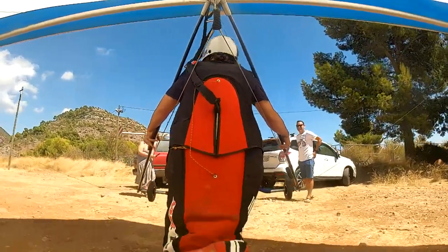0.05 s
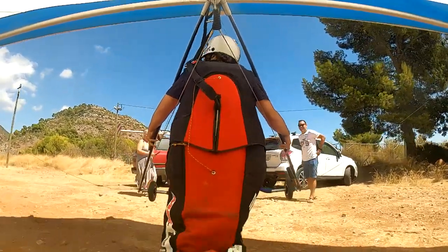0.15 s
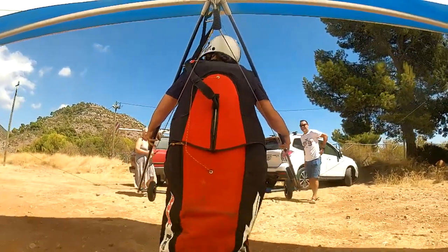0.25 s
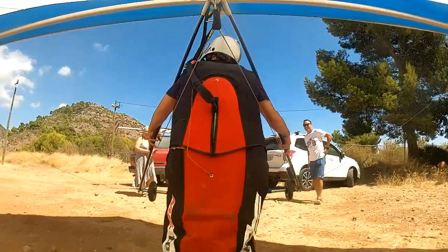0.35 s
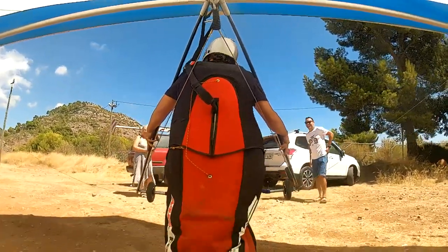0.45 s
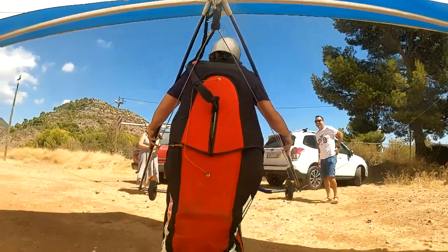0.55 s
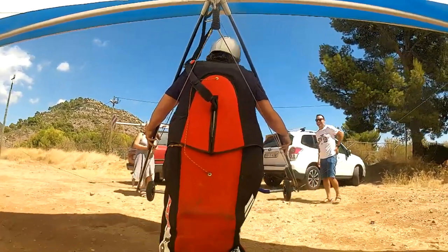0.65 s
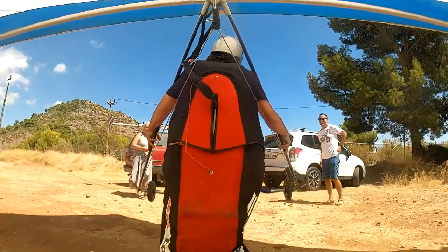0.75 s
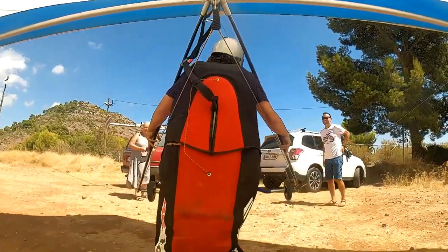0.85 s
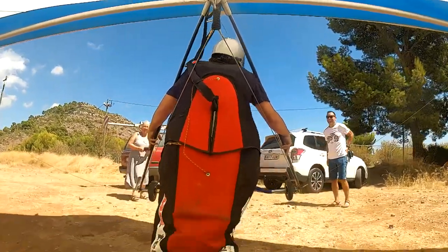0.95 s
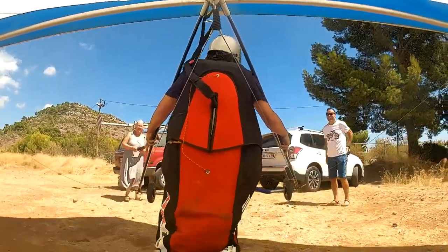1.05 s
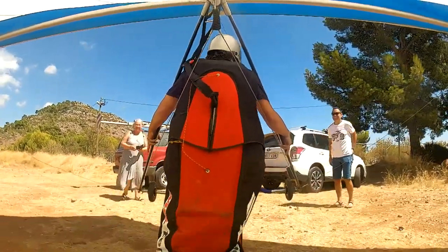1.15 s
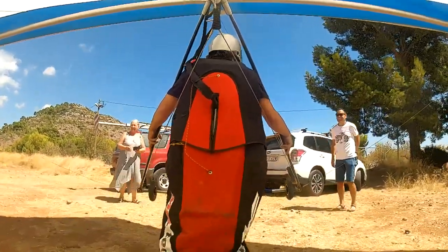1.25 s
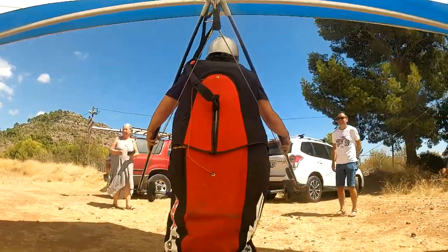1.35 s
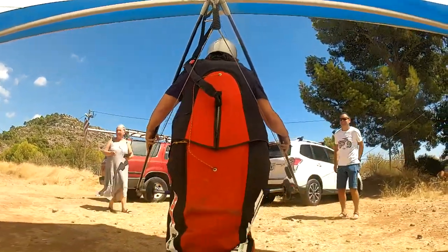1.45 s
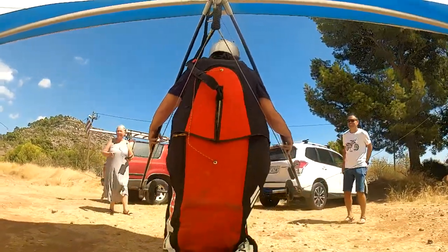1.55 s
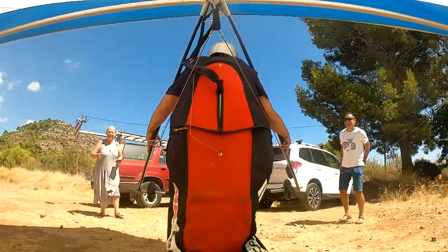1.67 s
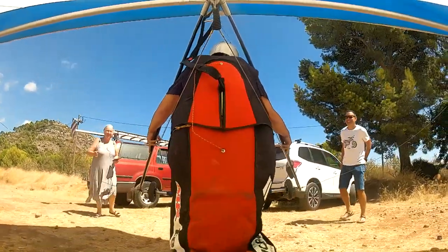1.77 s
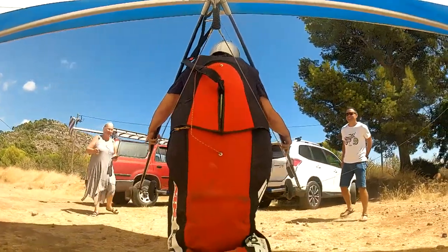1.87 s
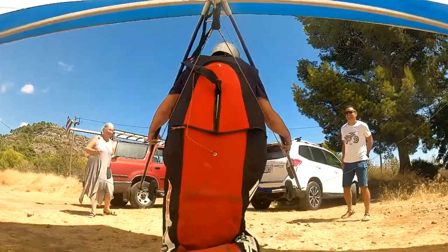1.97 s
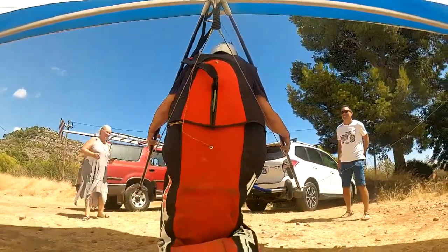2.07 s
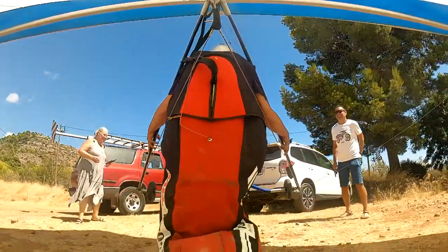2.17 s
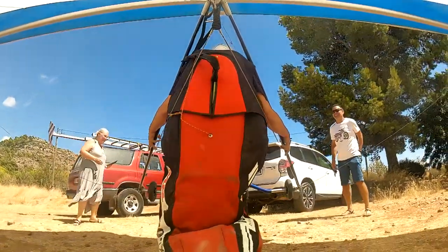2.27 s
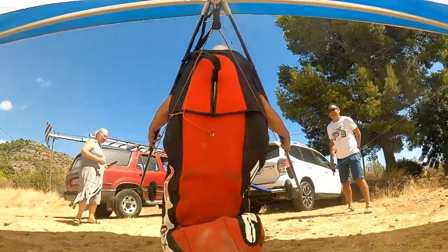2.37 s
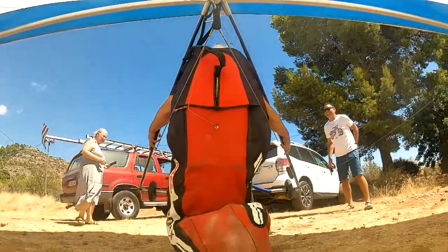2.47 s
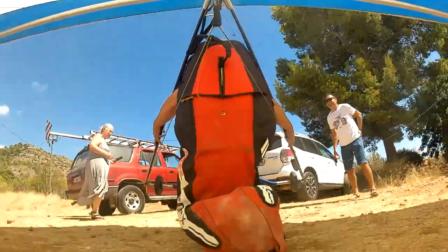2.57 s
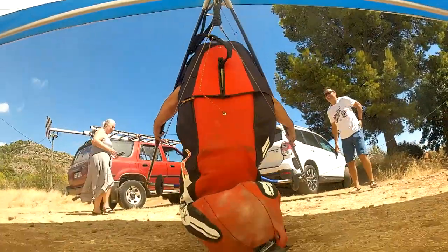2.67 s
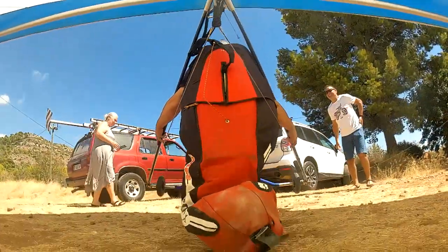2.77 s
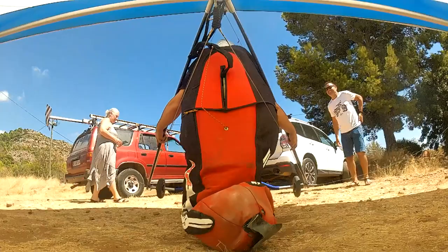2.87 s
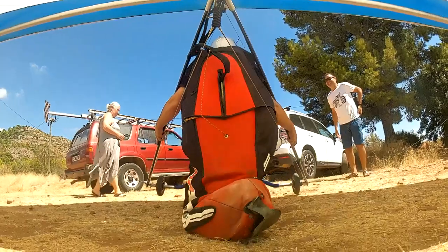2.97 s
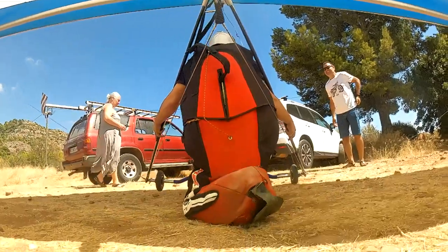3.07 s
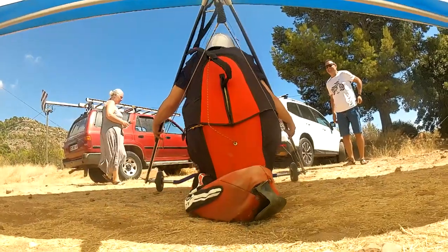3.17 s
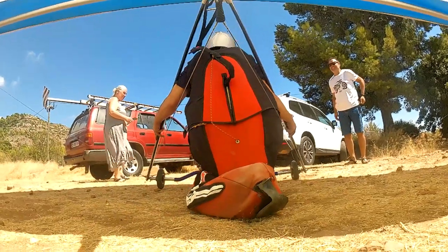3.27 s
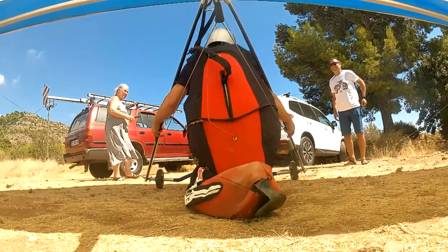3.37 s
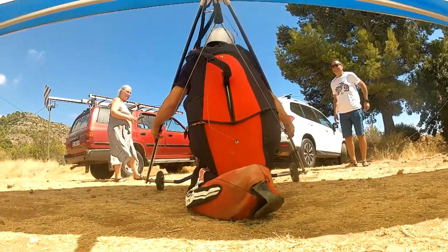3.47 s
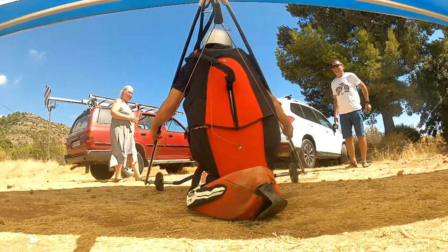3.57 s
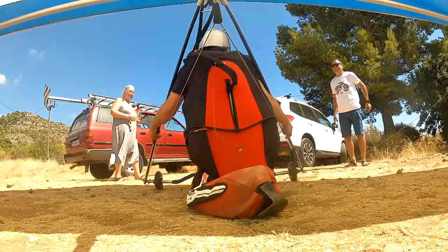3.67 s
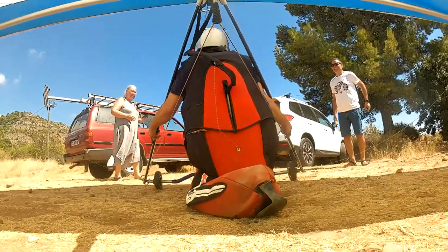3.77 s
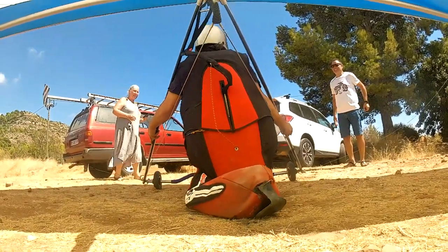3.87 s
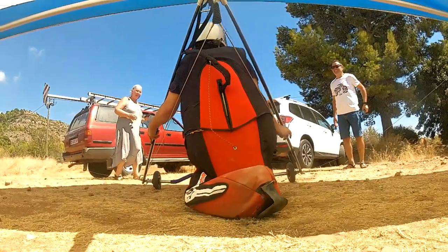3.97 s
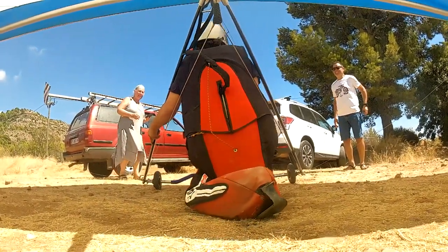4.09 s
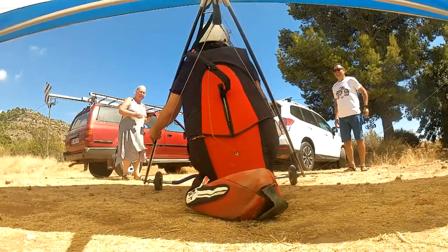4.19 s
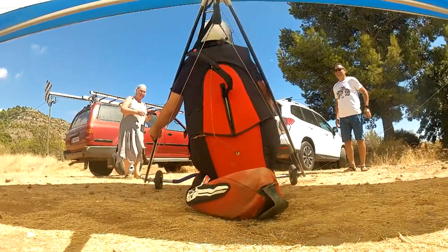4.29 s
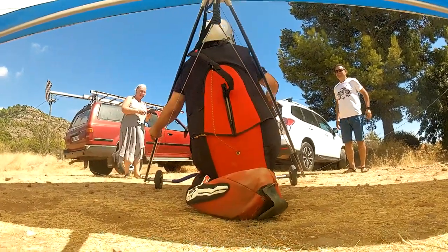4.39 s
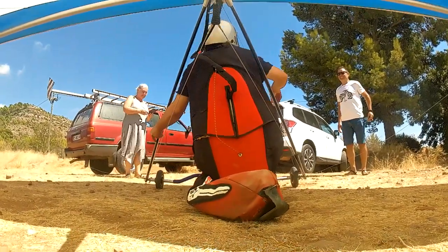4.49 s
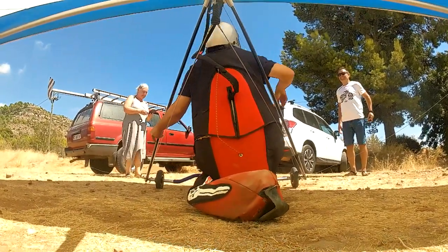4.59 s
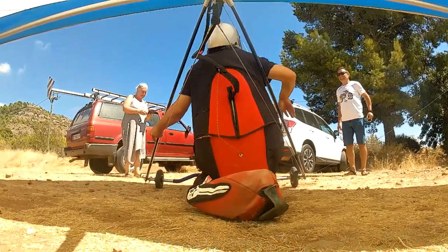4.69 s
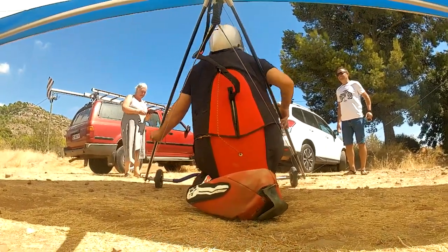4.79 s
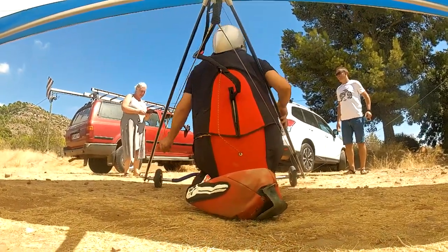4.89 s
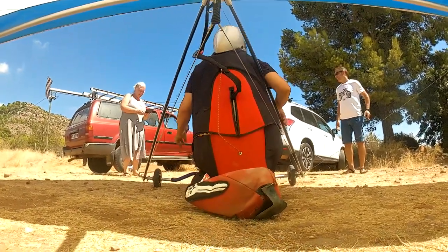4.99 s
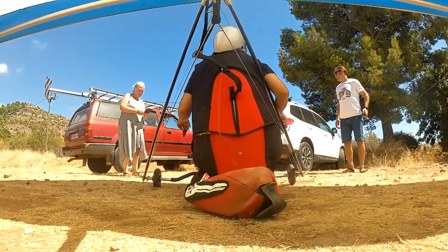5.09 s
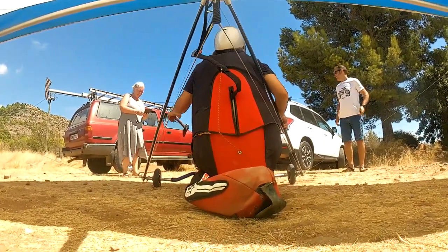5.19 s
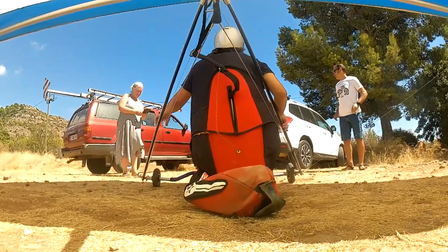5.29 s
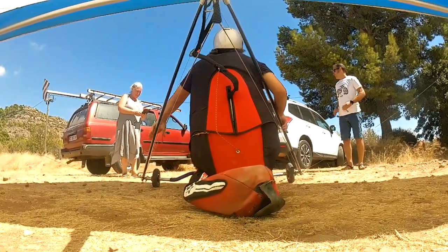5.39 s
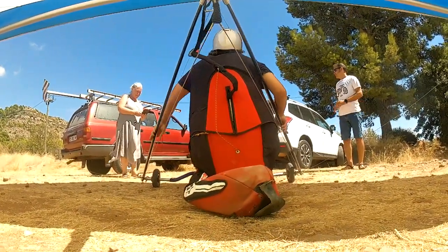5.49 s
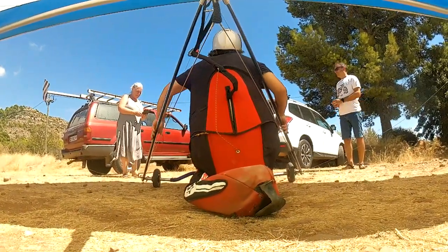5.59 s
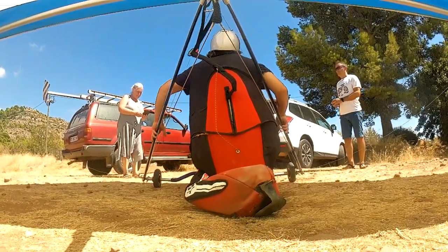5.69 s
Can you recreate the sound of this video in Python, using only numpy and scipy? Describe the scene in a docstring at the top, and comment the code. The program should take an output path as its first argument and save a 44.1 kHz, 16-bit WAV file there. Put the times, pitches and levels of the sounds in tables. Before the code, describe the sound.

A rough, dry clatter carried through the metal tubing: irregular ringing knocks over short gritty scrapes while the glider rolls. It is quiet briefly, then a harsh crash distorts the mount-fixed microphone, and a second grinding jolt follows shortly after. Several firm clacks trail off into small taps, rubs and creak-like scrapes of rigging, with dull low movement and thin hiss beneath.

```python
"""Stones knock the tubes and grit grinds as a hang glider is wheeled over stony dirt, heard through its keel.
Two hard jolts overload the microphone; then the pilot shifts in the harness and the rigging taps and rubs.
Knocks, grinding and shaking are noise forces that ring five resonant parts of the frame.
Mount ticks, dull bumps and the low rumble of the rocking wing are added, then hard clipping and hiss."""
import sys
import numpy as np
from scipy import signal
from scipy.fft import rfft, irfft, next_fast_len
from scipy.io import wavfile
from scipy.ndimage import map_coordinates

SR = 44100
rng = np.random.default_rng(int(sys.argv[2]) if len(sys.argv) > 2 else 0)


def generate_wav(sig):
    """Save sig (samples, or channels by samples) to the path in sys.argv[1] as 16-bit PCM at SR."""
    pcm = np.round(np.clip(np.atleast_2d(sig).T, -1, 1) * 32767).astype(np.int16)
    wavfile.write(sys.argv[1], SR, pcm)


N = 253134
TIME_S = np.arange(N) / SR


def amp(db):
    """Amplitude factor from dB."""
    return 10 ** (np.asarray(db) / 20)


def unit(x):
    """Scale to an rms of 1."""
    return x / np.sqrt(np.mean(x ** 2) + 1e-20)


def curves(rows):
    """One value per sample for each column after the time, by linear interpolation."""
    s, *columns = np.transpose(rows)
    return [np.interp(TIME_S, s, column) for column in columns]


def wobble(rate_hz):
    """Smooth random curve with rate_hz knots a second."""
    knots = rng.standard_normal(int(N * rate_hz / SR) + 4)
    return map_coordinates(knots, [np.arange(N) * rate_hz / SR])


def filtered(x, response):
    """Multiply the spectrum of x by a complex response of frequency in Hz."""
    m = next_fast_len(N + SR // 2)
    return irfft(rfft(x, m) * response(np.fft.rfftfreq(m, 1 / SR)), m)[..., :N]


def ring(force, modes, soft_hz):
    """A force rings the modes through a soft contact, low-passed at soft_hz; white force keeps its rms."""
    def response(f):
        h = 0
        for k, (center, width, db) in enumerate(modes):
            resonance = 1j * f * width / (center * center - f * f + 1j * f * width)
            h = h + (-1) ** k * amp(db) * resonance
        u = 1j * f / soft_hz
        h = h / (u * u + .77 * u + 1) / (u * u + 1.85 * u + 1)
        return h / np.sqrt(np.mean(np.abs(h) ** 2))
    return filtered(force, response)


def grit(rate_hz, spiky_db, bed):
    """Random small impacts of uneven size over a bed of steady rubbing."""
    sizes = amp(spiky_db * np.minimum(rng.exponential(1, N), 3))
    hits = (rng.random(N) < rate_hz / SR) * sizes
    smear = amp(-60 * np.arange(SR // 100) / SR / 0.0037)  # T60 3.7 ms
    envelope = bed + unit(signal.fftconvolve(hits, smear)[:N])
    return unit(rng.standard_normal(N) * envelope)


def blows(times_s, levels_db, t60_s, rise_s, first):
    """A first contact, then a rattle that dies away; the rattle has energy 1 at 0 dB."""
    force, t = np.zeros(N + SR), np.arange(SR // 15) / SR
    for s, db in zip(times_s, levels_db):
        rattle = rng.standard_normal(len(t)) * amp(-60 * t / t60_s) * (1 - np.exp(-t / rise_s))
        push = rattle / np.linalg.norm(rattle) + first * (t == 0)
        force[round(s * SR):][:len(t)] += amp(db) * push
    return force[:N]


def strokes(starts_s, lengths_s, levels_db, attack_s, release_s):
    """Sum of envelopes that swell, hold and die away."""
    total = np.zeros(N)
    for s, length, db in zip(starts_s, lengths_s, levels_db):
        swell = np.clip((TIME_S - s) / attack_s, 0, 1) ** 2
        total += amp(db) * swell * np.exp(-np.maximum(TIME_S - s - length, 0) / release_s)
    return total


STOP_S = 2.8  # the wheels stop

# Resonances of the frame parts. Each row: center in Hz, width in Hz, relative level in dB.
STRUT_MODES = [(1328.6, 85, 11.5), (1494, 157, 11), (1607, 148, 10), (1943, 47, -5.5), (2107, 22, -3)]
TUBE_MODES = [(1048.5, 59.6, 0)]
BAR_MODES = [(622, 71, -2.5), (742.8, 72, 4), (866, 185, -0.5)]
FITTING_MODES = [(2697, 380, -7.5), (3470, 240, -11.5), (3608, 270, -4), (4013, 260, -3.5),
                 (4740, 450, -10), (5200, 210, -33.5)]
KEEL_MODES = [(128, 53, -6), (209, 48, -2), (288, 86.6, -3), (390.4, 109, -6)]


def frame():
    """Knocks, grinding and jolts drive each part of the frame at its own strength."""
    knock, grind = knocks(), grinding()
    shake = jolts() * grit(rate_hz=900, spiky_db=4.5, bed=0.9)
    # fittings: opposite sign, so the sound stays full between strut and fitting resonances
    parts = [  # name, modes, contact softness Hz, share of the jolts dB, sign
        ("struts", STRUT_MODES, 2400, -7, 1),
        ("tube", TUBE_MODES, 2200, -1.5, 1),
        ("bar", BAR_MODES, 1800, -8, 1),
        ("fittings", FITTING_MODES, 4900, -20, -1),
        ("keel", KEEL_MODES, 700, -5, 1)]
    out = np.zeros(N)
    for name, modes, soft_hz, jolt_db, sign in parts:
        uneven_grip = amp(2.4 * wobble(30))
        force = knock[name] + uneven_grip * grind[name] + amp(jolt_db) * shake
        out += sign * ring(force, modes, soft_hz)
    return out


# Knocks on the frame. Each row: time in seconds, level in dB before the part gains,
# then keel, bar and fittings in dB against that level.
KNOCK_ROWS = [(0.062, -17.5, -10, -12.5, -35), (0.107, -10, -25, -24, -33), (0.128, -15, -15, -19.5, -27),
              (0.172, -22, 0, -12, -31), (0.211, -28, -13, -9, -18), (0.231, -11.5, -28, -16.5, -27),
              (0.266, -15, -26, -32, -35), (0.305, -25, -13, -18, -22), (0.338, -15, -7, -16, -27),
              (0.416, -11.5, -17, -16, -43), (0.475, -35, -1, -7, -20), (0.55, -18, -4.5, -15, -24),
              (0.587, -18.5, -13, -12, -12.5), (0.721, -2, -29, -21, -24.5), (0.753, -4.5, -18, -28, -27),
              (0.834, -8, -20, -15.5, -29.5), (0.859, -9.5, -18, -24, -37), (0.899, -13, -28, -15.5, -17),
              (0.926, -18, -6.5, -12.5, -30), (0.969, -27.5, -16, -5, -35), (1, -30, -6, -21, -45),
              (1.033, -21.5, -13, -9, -41), (1.085, -23.5, -11, -22, -29), (1.116, -23.5, -20, -24, -36),
              (1.179, -30, 10, -3.5, -28), (1.213, -20.5, -22, -28, -25), (1.278, -16.5, -7, -34, -40),
              (1.331, -21, -14, -15, -33), (1.376, -12.5, -5.5, -20, -21.5), (1.41, -12.5, -11, -26, -38),
              (1.468, -21.5, 4, -8, -24), (1.568, -25.5, -4, -27, -17), (1.71, -11.5, -19, -15, -19),
              (1.719, -2.5, -25, -22, -25.5), (1.744, -13, -12.5, -24, -22), (1.776, -15.5, -18, -15, -30),
              (1.801, -16, -33, -16, -54), (1.95, -22.5, -8, -4.5, -35), (1.986, -20, -16, -19, -23.5),
              (2.056, -17, -14, -30, -48), (2.126, -28.5, 6, -25, -30), (2.147, -15.5, -13, -16, -34),
              (2.287, -17.5, -15, -8.5, -40), (2.422, -24, -3.5, -8, -31), (2.476, -30.5, -3, -16, -30),
              (2.771, -21.5, 2.5, -21, -11), (2.788, -15, -27, -30, -29), (2.951, -14, -4, -6, -27),
              (2.986, -8.5, -20, -3, -33), (3.257, -6, -19, -4, -29), (3.329, -24.5, -7, -20, -16.5),
              (3.419, -5.5, -22, -5, -27.5), (3.52, -9, -7.5, -21, -32), (3.554, -16.5, -7, -14, -29),
              (3.602, -17.5, -1, -7, -20), (3.687, -20.5, -14, -14.5, -36), (3.759, -7, -8, -16, -31),
              (3.799, -5, -16, -24, -27.5), (3.843, -16.5, -24, -13, -23), (3.915, -30, -12, -4.5, -44),
              (3.956, -37, -15, -15, -28), (3.975, -29, -20, -16, -24), (4.117, -29, 5, -10, -30),
              (4.176, -25.5, -19, -10.5, -28), (4.222, -18.5, -5.5, -11, -26.5),
              (4.253, -23, -24, -10, -25), (4.414, -16.5, -4, -8.5, -23), (4.436, -11.5, -30, -17, -24),
              (4.507, -17, -23.5, -13, -27), (4.535, -19, -18, -7, -25), (4.585, -16, -19, -7, -29),
              (4.64, -16.5, -10.5, -10.5, -28.5), (4.681, -18, -11.5, -9, -27),
              (4.784, -14, -15, -13.5, -30.5), (4.815, -19.5, -17, -23, -23), (4.945, -29, -11, -10, -24),
              (5.02, -34.5, -13, -19, -24), (5.079, -34.5, -1, 3, -40), (5.158, -39, -12, 0, -23),
              (5.232, -22, -13, -8, -25), (5.281, -25.5, -14, -5, -23), (5.379, -32.5, -5, -1.5, -18),
              (5.407, -16.5, -6.5, -6.5, -23), (5.453, -15, 0, -4.5, -26), (5.475, -15, -15, -14, -20.5),
              (5.516, -14, -11.5, -11, -28.5), (5.622, -37.5, -2, -1, -22),
              (5.652, -14.5, -9.5, -9.5, -25.5), (5.726, -39.5, 8.5, 3.5, -40.5)]


def knocks():
    """Knock force on each part: a first contact, weakest on the fittings, then a rattle."""
    s, level, keel, bar, fittings = np.transpose(KNOCK_ROWS)
    tube = np.where(s < STOP_S, -12.5, -7.5) + 3.5 * rng.standard_normal(len(s))  # dB, scattered per knock
    rise_s = .002
    return {"struts": blows(s, level + 10, .035, rise_s, 1.4),
            "tube": blows(s, level + tube + 15, .03, rise_s, 1.4),
            "bar": blows(s, level + bar + 19, .03, rise_s, 1.4),
            "fittings": blows(s, level + fittings + 19, .035, rise_s, 3400 / 4900),
            "keel": blows(s, level + keel + 17, .045, rise_s, 1.4)}


def grinding():
    """Grinding force on each part: single grains merge into a scrape as the rubbing gets harder."""
    grip_s = 4.2  # the pilot's hands work on the bar
    level, keel_level = rubbing()
    bar = np.where(TIME_S < grip_s, -9, -2.5)  # dB, before the part level
    tube = np.where(TIME_S < STOP_S, -3, 0.5) - .3 * (level - level.mean())  # grows less than the struts
    dense = np.clip((level + 48) / 22, 0, 1)
    grains = grit(rate_hz=76, spiky_db=1, bed=0.53)
    scrape = grit(rate_hz=390, spiky_db=0.5, bed=0.94)
    rough = (np.sqrt(1 - dense) * grains + np.sqrt(dense) * scrape) * amp(2.4 * wobble(40))
    keel_rough = 0.26 * rough + 0.62 * rng.standard_normal(N)
    return {"struts": amp(level - 3.5) * rough,
            "tube": amp(level + tube) * rough,
            "bar": amp(level + bar) * rough,
            "fittings": amp(level - 27.5) * rough,
            "keel": amp(keel_level - 1.08 + 1.3 * wobble(20)) * keel_rough}


# Strokes of grit and cloth along the frame.
# Each row: start in seconds, length in seconds, level in dB, keel weight in dB against the level.
SCRAPE_ROWS = [(-.015, 0.017, -28, 2.5), (0.091, 0.035, -40, -1), (0.159, 0.055, -36.5, 9.5),
               (.225, 0.054, -43, -14), (0.327, 0.099, -32.5, 3.5), (0.494, 0.067, -35, 10),
               (0.599, 0.053, -28.5, 2), (0.717, 0.067, -28.5, 0.5), (0.833, 0.029, -36, 2),
               (.89, 0.047, -46, -14), (0.986, 0.019, -33.5, 11), (1.08, 0.032, -39, -15),
               (1.198, 0.052, -47.5, -16), (1.375, 0.046, -23, -9), (1.494, .08, -30, 4.5),
               (1.592, 0.061, -39.5, 1), (1.696, 0.045, -24.5, -5), (1.758, 0.066, -41.5, -0.5),
               (1.842, 0.058, -45.5, 0), (1.94, 0.032, -29.5, -8), (2.026, 0.04, -41.5, -2),
               (2.116, 0.072, -39.5, -0.5), (2.168, 0.094, -30, 4), (2.369, 0.046, -51.5, 5),
               (2.538, 0.016, -29, -11), (3.409, 0.054, -30.5, 4.5), (3.58, 0.079, -38, 0),
               (3.905, 0.056, -52, 7), (4.068, 0.056, -49.5, 12), (4.245, 0.093, -28.5, -0.5),
               (4.378, 0.032, -40, 10), (4.489, 0.023, -31.5, -10.5), (4.527, 0.026, -34.5, -5),
               (4.569, 0.028, -35.5, -6), (4.78, 0.027, -43.5, 10), (5.191, 0.053, -41, 0),
               (5.31, 0.023, -44, 7), (5.396, 0.074, -35.5, 3.5), (5.486, 0.017, -42, 9)]
# Steady drag under the strokes. Each row: time in seconds, level in dB, keel weight in dB against the level.
DRAG_ROWS = [(0.0, -39.5, 4), (.8, -49.5, 10.5), (1.3, -45.5, 12), (1.9, -53, 13), (2.34, -52.5, 9),
             (2.54, -47, 7.5), (2.63, -16.5, -3), (2.76, -30, 5.5), (2.85, -42.5, 7), (2.94, -22.5, 4.5),
             (3.02, -14.5, 2), (3.12, -17.5, 3), (3.255, -21.5, -0.5), (3.3, -36, 2), (3.68, -38.5, 13),
             (3.88, -47, 10.5), (4.05, -52, 12.5), (4.45, -38.5, 9.5), (4.75, -52, 14.5), (4.92, -48.5, 10),
             (5.15, -52, 14), (5.74, -57, 14.5)]


def rubbing():
    """Grinding level in dB before the part gains, for struts and keel: strokes added to the drag."""
    s, length, level, weight = np.transpose(SCRAPE_ROWS)
    drag, drag_weight = curves(DRAG_ROWS)
    levels = []
    for under_db, stroke_db in [(drag, level), (drag + drag_weight, level + weight)]:
        over = strokes(s, length, stroke_db, attack_s=0.0092, release_s=0.015)
        levels.append(20 * np.log10(amp(under_db) + over))
    return levels


# Bursts of shaking in the two jolts. Each row: start in seconds, length in seconds, level in dB.
JOLT_ROWS = [(2.557, .053, 6), (3.018, .028, -7), (3.052, .038, -2), (3.094, .021, -1)]


def jolts():
    """Strength of the shaking: bursts that swell and die away, nothing before the first."""
    return strokes(*np.transpose(JOLT_ROWS), attack_s=.01, release_s=.005)


# Sharp ticks at the microphone mount. Each row: time in seconds, level in dB before a 12 dB gain.
TICK_ROWS = [(0.8634, -56), (1.08, -48.5), (1.4026, -40.5), (2.628, -29.5), (2.6418, -33), (2.6489, -16.5),
             (2.661, -29), (2.68, -26), (2.6914, -35.5), (2.7036, -24.5), (2.716, -21), (2.722, -18),
             (2.7308, -45), (2.74, -41), (2.7591, -24), (2.7821, -42), (2.9658, -31), (2.9861, -28.5),
             (3.007, -31.5), (3.1294, -37), (3.1382, -34.5), (3.1642, -31), (3.1807, -34), (3.2061, -24.5),
             (3.257, -28), (3.4186, -23), (3.62, -34.5), (4.1749, -44.5), (4.36, -38.5), (4.4777, -44),
             (4.9362, -40.5), (5.4616, -39)]


def ticks():
    """Millisecond clicks that reach the treble; hard shaking makes the mount chatter."""
    s, level = np.transpose(TICK_ROWS)
    chatter = amp(-23) * jolts() ** 2 * grit(rate_hz=170, spiky_db=3.5, bed=0.43)
    clicks = blows(s, level + 12, t60_s=.011, rise_s=0.0016, first=0)
    return ring(clicks + chatter, [(4130, 550, 0)], soft_hz=14000)


# Dull bumps of the mount as the frame settles. Each row: time in seconds, level in dB before a 14 dB gain.
BUMP_ROWS = [(2.674, -10), (2.693, -11), (2.717, -4), (2.755, -11), (2.772, -13), (2.86, -17), (3.13, -8)]


def bumps():
    """Single low pushes through one broad, heavily damped mode."""
    push = np.zeros(N)
    s, level = np.transpose(BUMP_ROWS)
    push[np.round(s * SR).astype(int)] = -amp(level + 14)
    return ring(push, [(230, 350, 0)], soft_hz=600)


# Rocking of the wing. Each row: time in seconds, level in dB.
SWAY_ROWS = [(0.0, -48.5), (.6, -46.5), (1.2, -50), (1.75, -44.5), (2.49, -50), (2.59, -19.5),
             (2.86, -43.5), (3.15, -18), (3.32, -49.5), (3.64, -31.5), (4.12, -47), (4.22, -33),
             (4.6, -43.5), (4.9, -42), (5.4, -58), (5.46, -39.5), (5.74, -59)]
# Lowest modes of the wing. Each row: center in Hz, width in Hz, relative level in dB.
ROCKING_MODES = [(29.8, 30, -17.5), (57, 20, -9)]


def sway():
    """Noise rings the lowest modes of the wing into a rumble."""
    rumble = unit(ring(rng.standard_normal(N), ROCKING_MODES, soft_hz=150))
    return amp(curves(SWAY_ROWS)[0]) * rumble


def scene():
    """Sum of the frame, the mount and the wing, one channel."""
    return (frame() + ticks() + bumps() + sway())[None]


# Microphone noise spectrum. Each row: frequency in Hz, gain in dB on unit white noise.
HISS_ROWS = [(20, -86), (2000, -78.5), (4000, -65.5), (7000, -69.5), (11000, -73), (16000, -71.5)]


def record(dry):
    """The input stage clips hard, hisses, cuts all above the band limit and adds a constant offset."""
    f, db = np.transpose(HISS_ROWS)
    hiss = filtered(rng.standard_normal(N), lambda hz: amp(np.interp(np.log(hz + 1), np.log(f), db)))
    top, hardness, band_limit_hz, offset = .71, 18, 15950, -.004
    clipped = dry / (1 + np.abs(dry / top) ** hardness) ** (1 / hardness)
    return filtered(clipped + hiss, lambda hz: hz < band_limit_hz) + offset


dry = scene()
out = record(dry)
generate_wav(out)
```